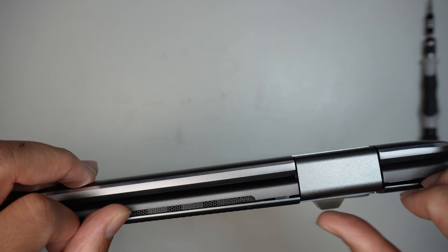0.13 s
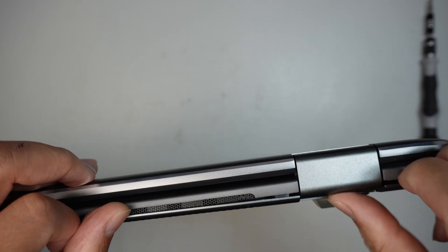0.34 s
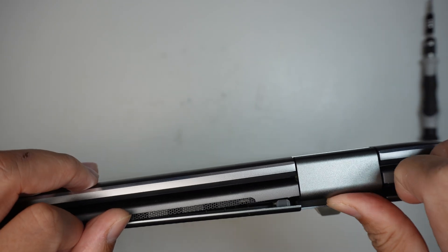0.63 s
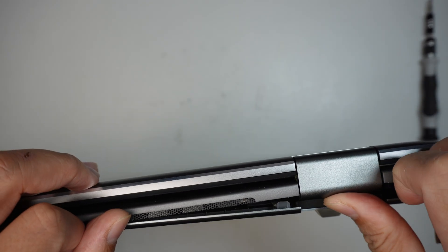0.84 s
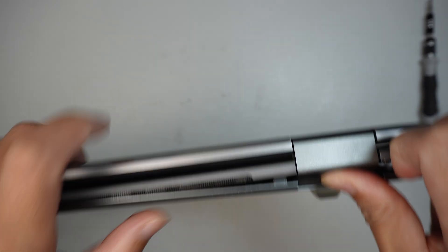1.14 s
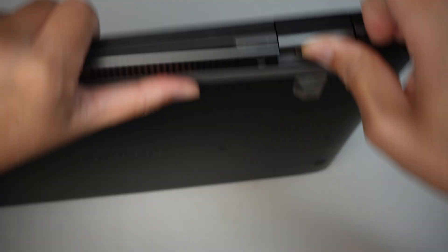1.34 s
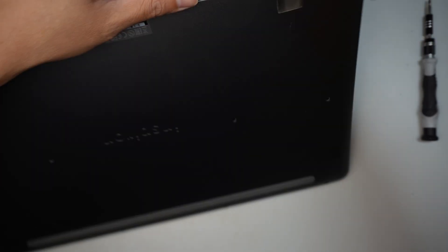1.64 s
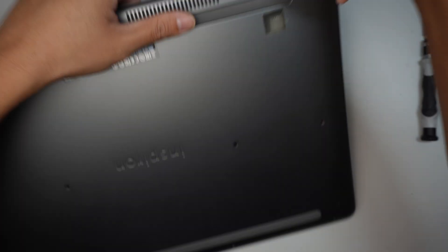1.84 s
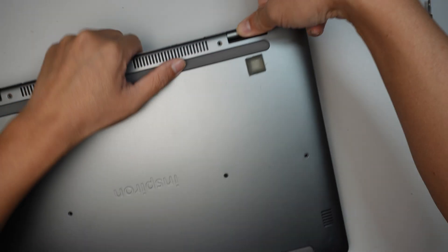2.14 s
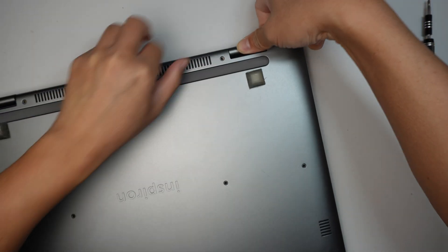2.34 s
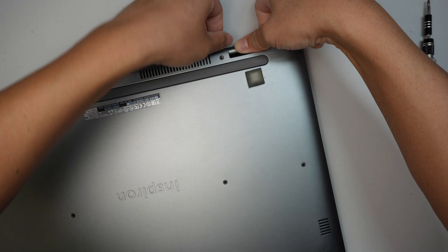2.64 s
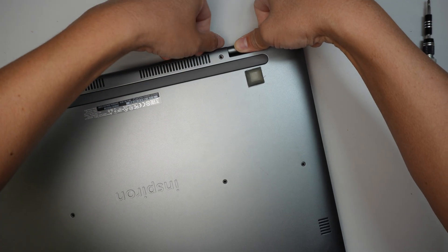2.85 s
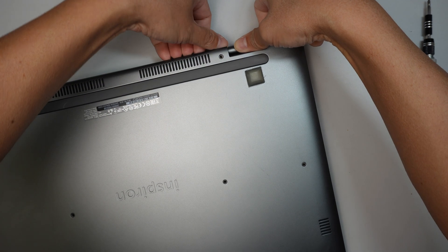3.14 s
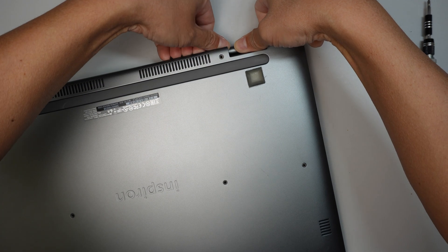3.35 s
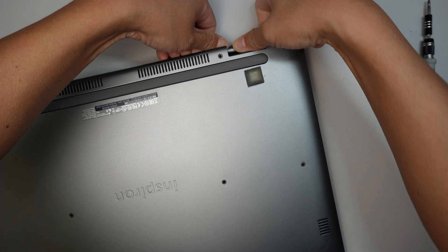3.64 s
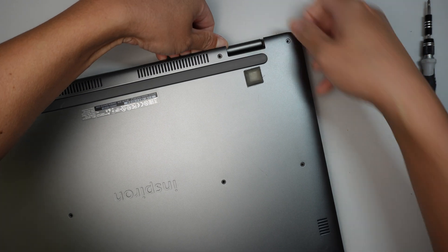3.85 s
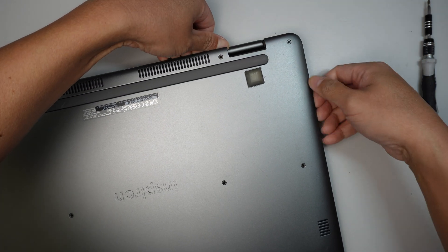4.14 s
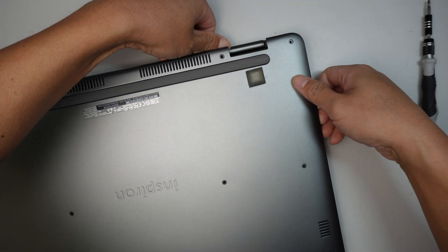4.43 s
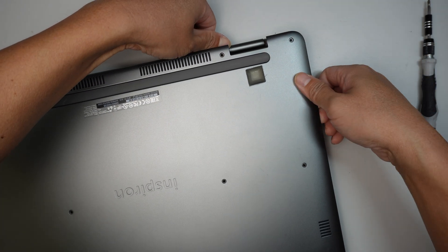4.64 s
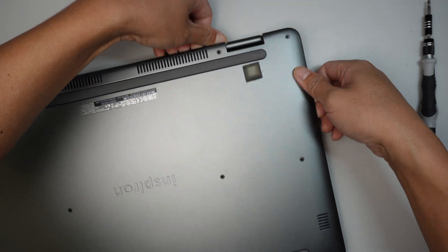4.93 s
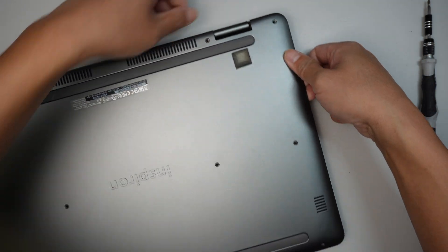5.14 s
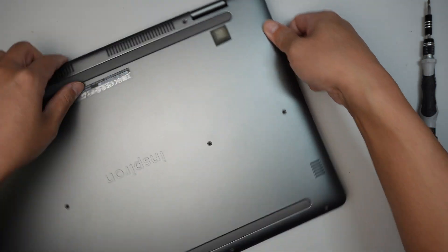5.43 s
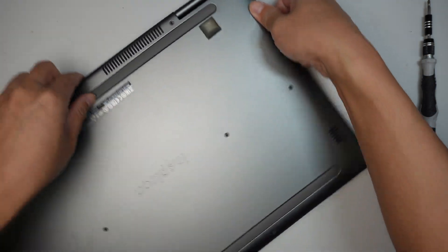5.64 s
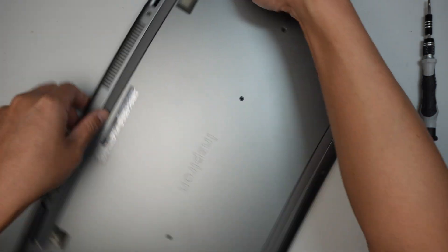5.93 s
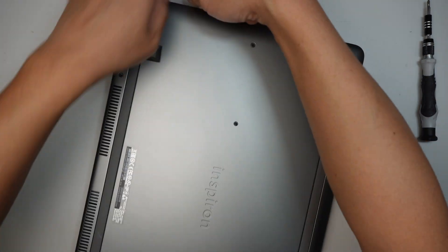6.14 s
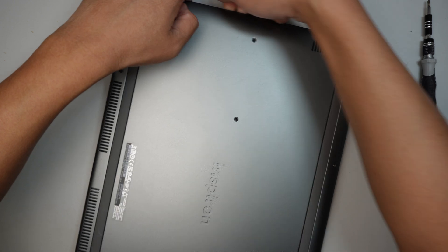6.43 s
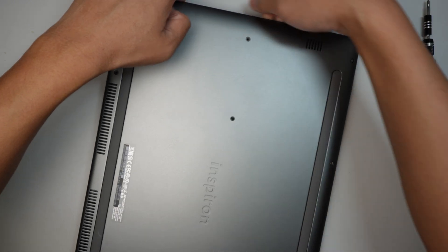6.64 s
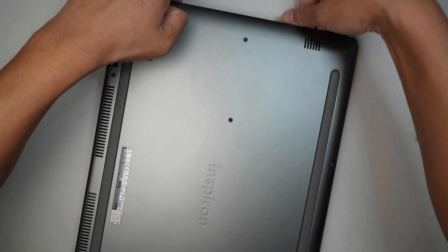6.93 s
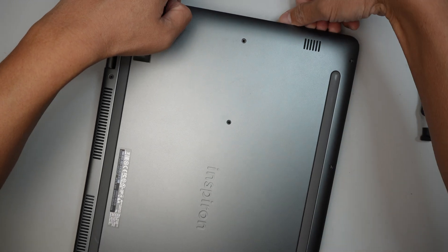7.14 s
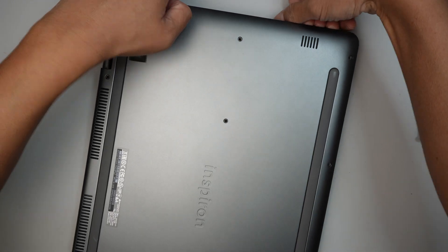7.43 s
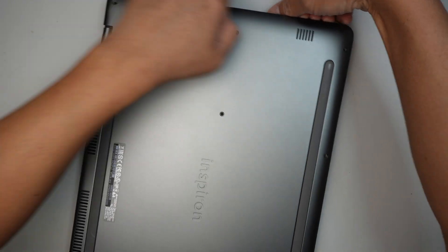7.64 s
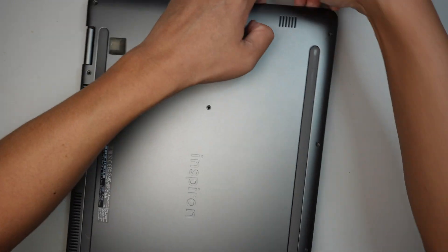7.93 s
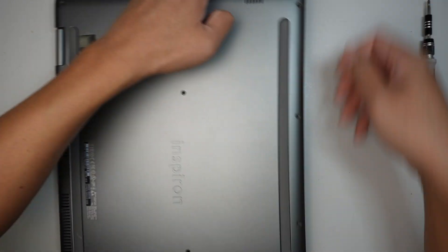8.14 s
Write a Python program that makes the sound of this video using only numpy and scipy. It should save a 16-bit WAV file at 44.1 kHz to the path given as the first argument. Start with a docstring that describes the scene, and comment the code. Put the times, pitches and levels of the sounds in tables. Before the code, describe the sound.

A small room, heard very close above a desk, with uneven low rumble and slight hiss. Faint finger ticks precede a crisp plastic snap at 0.6 s; soft rubbing follows around 1.2. A weak click at 1.4 leads into gritty dragging and a coarse, falling grind until about 2.2, when heavy snaps break in, with a dull desk bump at 2.3. Smaller clicks run to a very loud bright double crack at 2.85. From 3 to 4 it is nearly quiet, only rubs and tiny nail ticks; light clicks lead to a firm snap with a bump at 4.5. Between 5.3 and 6.2 the laptop scrapes round in bright strokes with a rising grind, then fainter shuffling. Sharp high snaps cluster at 7.1 to 7.3; deeper cracks at 7.7 to 7.8 knock the chassis and make the loose cover ring hollowly. A light, airy slide peaks near 8.15 and fades.

```python
"""A desk in a small room, two microphone ports close above it: hands pry the bottom cover off a laptop.
Plastic clips snap free as noise bursts that ring the shell; the chassis bumps the desk in decaying sines.
Fingers rub and tick along the seam, and the laptop is dragged and ground round on the desk top: the sliding
is made of trains of tiny slips, as is a faint dark noise under the handling.
Reflections, a lumpy low rumble and a faint hiss lie behind."""
import sys
import numpy as np
from scipy import signal
from scipy.fft import rfft, irfft, next_fast_len
from scipy.io import wavfile
from scipy.ndimage import uniform_filter1d, map_coordinates

SR = 44100
rng = np.random.default_rng(int(sys.argv[2]) if len(sys.argv) > 2 else 0)


def generate_wav(sig):
    """Save sig (samples, or channels by samples) to the path in sys.argv[1] as 16-bit PCM at SR."""
    pcm = np.round(np.clip(np.atleast_2d(sig).T, -1, 1) * 32767).astype(np.int16)
    wavfile.write(sys.argv[1], SR, pcm)


N = 365588

# clips snapping along the seam: t/s, level/dB, weight/dB, brightness/dB, pitch f/Hz
CLIP_SNAPS = [(0.5814, -11.5, -12, -6.5, 1910), (1.377, -34.5, -11, -7.5, 3900),
              (2.156, -15.5, -7, -15.5, 1190), (2.196, -10.5, -6.5, -11.5, 1250),
              (2.336, -17.5, -2, -17.5, 1380), (2.4102, -28, -4, -12, 3220), (2.564, -25, -6.5, -6, 4000),
              (2.613, -33, -3.5, -3, 4360), (2.734, -27, -2, -10.5, 1070), (2.78, -29.5, 2, -7, 1200),
              (2.8518, -10, -6.5, -4, 3070), (2.8649, -12, -5.5, -18, 2206), (4.053, -30, -3.5, -4, 2130),
              (4.265, -29.5, -4.5, -1.5, 2320), (4.4935, -16.5, -8, -0.5, 3900),
              (4.4991, -17.5, -1, -7.5, 910), (4.5785, -29, -2.5, -8, 3520),
              (7.0585, -28, -8.5, -6.5, 3100), (7.0797, -25.5, -13, 0, 4430), (7.087, -19, -5, 1, 5400),
              (7.102, -18, -2.5, -3, 4400), (7.2445, -30, -14, -14, 3470), (7.275, -13, -5, -3.5, 5460),
              (7.348, -27, -8, -7.5, 2540), (7.7143, -16.5, -16, -27, 3380), (7.7199, -11, -4.5, -6.5, 830),
              (7.7447, -18.5, -3, -13, 2030), (7.791, -13, -5, -11, 1580), (7.8145, -31.5, -14, -3, 1620)]
# colour of a sudden blow on the plastic: f/Hz, level/dB
BLOW_COLOUR = [(110, -15.5), (290, -11.5), (550, 2.5), (3800, 3), (9000, -6.5), (15500, -16.5)]


def amp(db):
    """Decibels to gain."""
    return 10 ** (np.asarray(db) / 20)


def evened(x):
    """Scales to rms 1."""
    return x / np.sqrt(np.mean(x ** 2) + 1e-20)


def read(points, hz):
    """Reads a table on a log-frequency axis."""
    f, value = np.transpose(points)
    return np.interp(np.log(hz + 1), np.log(f + 1), value)


def add(mix, s, sound):
    """Mixes a sound in at a time in seconds."""
    part = mix[..., max(round(s * SR), 0):][..., :sound.shape[-1]]
    part += sound[..., :part.shape[-1]]


def shaped(x, gain):
    """Filters by a gain that is a function of frequency."""
    size = next_fast_len(x.shape[-1] + 512)
    spectrum = rfft(x, size) * gain(np.fft.rfftfreq(size, 1 / SR))
    return irfft(spectrum, size)[..., :x.shape[-1]]


def coloured(x, colour, size=1024):
    """Causal minimum-phase filter with a given spectrum, so that attacks stay sharp."""
    log_gain = np.log(amp(read(colour, abs(np.fft.fftfreq(size, 1 / SR)))))
    taps = np.fft.ifft(np.exp(np.conj(signal.hilbert(log_gain)))).real
    taps = taps.reshape((1,) * (x.ndim - 1) + (-1,))
    return signal.fftconvolve(x, taps, axes=-1)[..., :x.shape[-1]]


def resonate(x, hz, width):
    """A resonance of gain 1 at its peak, width in Hz."""
    return signal.lfilter(*signal.iirpeak(hz, hz / width, fs=SR), x)


def glide(x, hz, width):
    """A resonance of gain 1 that follows a pitch curve: shift to zero, smooth, shift back."""
    turn = np.exp(2j * np.pi * np.cumsum(hz) / SR)
    r = np.exp(-np.pi * width / SR)
    return 2 * (turn * signal.lfilter([1 - r], [1, -r], x / turn)).real


def spread(pair):
    """Two unrelated signals become what two close microphone ports hear of a wide source."""
    # left-right likeness of spread-out sound: f/Hz, likeness (0 to 1)
    likeness = [(1500, 0.96), (5000, 0.79), (15000, 0.25)]
    alike = lambda hz: np.clip(read(likeness, hz), -1, 1)
    unlike = lambda hz: np.sqrt(1 - alike(hz) ** 2)
    return np.array([pair[0], shaped(pair[0], alike) + shaped(pair[1], unlike)])


def registers(x, low_hz=1000, high_hz=4500):
    """Splits a sound into middle, weight and brightness."""
    cuts = [([low_hz, high_hz], "bandpass"), (low_hz, "lowpass"), (high_hz, "highpass")]
    return [signal.sosfilt(signal.butter(3, hz, kind, fs=SR, output="sos"), x) for hz, kind in cuts]


def voiced(x, db, weight_db, bright_db, over=slice(None), lean=0.33, usual_db=-6):
    """Sets level, weight and brightness: a firm broad contact is heavy, a light sharp one bright."""
    middle, low, high = (band / np.sqrt(np.mean(band[..., over] ** 2)) for band in registers(x))
    upper_middle = shaped(middle, lambda hz: hz ** 4 / (hz ** 4 + 2500 ** 4))
    tilt = amp(lean * (bright_db - usual_db))  # brightness also tilts the middle register
    middle = (middle + (tilt - 1) * upper_middle) / np.sqrt(tilt)
    return amp(db) * (middle + amp(weight_db) * low + amp(bright_db) * high)


def shell(x, direct, sharpness=18):
    """Part of a force radiates at once; the rest rings the resonances of the shell."""
    # resonances of the shell: f/Hz, level/dB
    modes = [(500, -9.5), (880, -6.5), (1150, -1.5), (1540, -2.5), (1890, -8), (2160, -4.5), (2490, -7.5),
             (3130, -4), (4380, -9.5), (5520, -8.5), (6450, -4), (8350, -11.5)]
    return direct * x + sum(amp(db) * resonate(x, hz, hz / sharpness) for hz, db in modes)


def wandering(x, depth_db, patch_hz, drift_s, size=512):
    """The colour drifts: resonances about patch_hz wide swell and fade over about drift_s."""
    hz, t, z = signal.stft(np.c_[x, np.zeros((2, size))], SR, nperseg=size)
    where = np.meshgrid(hz / patch_hz, t / drift_s, indexing="ij")
    patches = map_coordinates(rng.standard_normal((size, size // 10)), where, order=1, mode="wrap")
    return signal.istft(z * amp(depth_db * patches), SR, nperseg=size)[1][:, :x.shape[-1]]


def broadly_wandering(x):
    """Broad, quick drift in the colour of a moving contact."""
    return wandering(x, depth_db=2.2, patch_hz=600, drift_s=.05)


def friction(length, slips_per_s, uneven_db, wash, judder_db, judder_s, direct=1.3):
    """Tiny slips of uneven size, bunched by a juddering grip, excite the shell; the colour drifts."""
    # colour of sliding contact: f/Hz, level/dB
    slide_colour = [(280, -18.5), (500, -5.5), (750, -5), (1300, 1.5), (6500, 4.5), (8500, 2), (15500, -9)]
    slip_size = amp(uneven_db * np.minimum(rng.exponential(1, length), 4))
    slips = evened(slip_size * (rng.random(length) < slips_per_s / SR))
    judder_length = max(int(judder_s * SR), 1)
    grip = evened(uniform_filter1d(rng.standard_normal(length), judder_length))
    force = (slips + wash) * amp(judder_db * grip) * rng.standard_normal((2, length))
    x = shell(coloured(spread(force), slide_colour), direct)
    return wandering(x, depth_db=3.8, patch_hz=130, drift_s=.15)


def snaps(crack_s=0.0021, rise_s=0.0012, tick_s=0.00032, tick_db=3,
          rattle_db=-14, rattle_t60=0.073, rattle_top_hz=6000, direct=7):
    """A clip lets go with a tick and a crack, strikes its seat again, rings and sets the case rattling."""
    rebound_min_s, rebound_max_s, rebound_db = 0.0034, 0.0076, -12.5
    clip_ring, clip_width_hz = 1.9, 400
    out, t = np.zeros(N), np.arange(SR // 6) / SR
    attack = 1 - np.exp(-t / rise_s)
    blow = attack * (np.exp(-t / crack_s) + amp(tick_db) * np.exp(-t / tick_s))
    dying = attack * amp(rattle_db - 60 * t / rattle_t60)
    for s, db, weight_db, bright_db, hz in CLIP_SNAPS:
        crack, rattle = rng.standard_normal((2, len(t)))
        rebound_s = rng.uniform(rebound_min_s, rebound_max_s)
        crack = crack * (blow + amp(rebound_db) * np.interp(t - rebound_s, t, blow))
        clip = clip_ring * resonate(crack, hz, clip_width_hz)
        rattle = dying * shaped(rattle, lambda f: 1 / np.hypot(1, f / rattle_top_hz))
        x = shell(coloured(crack + clip + rattle, BLOW_COLOUR), direct)
        # the level is set over the first hundredth of a second
        add(out, s, voiced(x, db, weight_db, bright_db, slice(SR // 100)))
    return out


def body_rings(rise_s=0.00088, bump_t60=0.085, cover_hz=620):
    """Decaying sines: chassis bumps on the desk, each with a hollow knock, and the loose cover's note."""
    # the chassis bumps the desk: t/s, level/dB, f/Hz
    bump_list = [(2.335, -19.5, 113), (2.885, -26, 80), (4.503, -28, 120), (7.285, -27.5, 90),
                 (7.75, -19.5, 115), (7.804, -26, 97)]
    # hollow modes of the chassis in each bump: f/Hz, level re bump/dB
    knock_modes = [(205, -7), (375, -11)]
    # the loosened cover swings: t/s, level/dB, t60/s
    swing_list = [(7.7202, -19, 0.11), (7.79, -10, 0.17)]
    out, t = np.zeros(N), np.arange(SR // 2) / SR

    def ring(hz, db, t60):
        """One mode, struck softly and dying away."""
        return amp(db - 60 * t / t60) * np.sin(2 * np.pi * hz * t) * (1 - np.exp(-t / rise_s))

    for s, db, hz in bump_list:
        knock = sum(ring(mode_hz, db + mode_db, bump_t60) for mode_hz, mode_db in knock_modes)
        add(out, s, ring(hz, db, bump_t60) + knock)
    for s, db, t60 in swing_list:
        add(out, s, ring(cover_hz, db, t60))
    return out


def drags():
    """Each shove over the desk speeds up and slows; faster sliding is louder, brighter and less weighty."""
    # shoves: start t/s, fastest t/s, end t/s, then at the fastest: level/dB, weight/dB, brightness/dB
    shove_list = [(1.386, 1.65, 1.95, -23, -14, -7.5), (1.727, 1.83, 1.96, -23.5, -15.5, -6.5),
                  (1.875, 2.08, 2.24, -26.5, -11.5, -12), (4.851, 4.95, 5.08, -39, -3, -6.5),
                  (4.758, 5.424, 5.55, -41, -1, -3), (5.26, 5.598, 5.72, -28.5, -11, 2.5),
                  (5.638, 5.874, 6.08, -28, -4, 0.5), (5.848, 6.032, 6.15, -29.5, -10.5, 1.5),
                  (6.149, 6.204, 6.3, -39, -3.5, -9.5), (6.27, 6.44, 6.88, -36.5, -3, -5.5),
                  (6.604, 6.76, 6.85, -39, -13, -6), (7.411, 7.706, 7.8, -35, -2.5, -6.5),
                  (7.839, 8.145, 8.6, -31, -8.5, 1.5)]
    # dB gained for each dB of sliding speed
    level_per_speed, weight_per_speed, bright_per_speed = 0.94, -0.34, 0.59
    out = np.zeros((2, N))
    for start, fastest, end, db, weight_db, bright_db in shove_list:
        t = np.arange(start, end, 1 / SR)
        x = friction(len(t), slips_per_s=4000, uneven_db=2.0, wash=0.8,
                     judder_db=1.47, judder_s=0.03, direct=.8)
        x = broadly_wandering(x)
        speed = np.sin(np.pi / 2 * np.interp(t, [start, fastest, end], [0, 1, 0]))
        speed_db = 20 * np.log10(speed + 1e-3)
        add(out, start, voiced(x, db + level_per_speed * speed_db,
                               weight_db + weight_per_speed * speed_db,
                               bright_db + bright_per_speed * speed_db))
    return out


def grinds(peak_width_hz=750, desk_hz=480, desk_width_hz=170, desk_db=4):
    """A hard-pressed edge slips coarsely: a resonance glides as the laptop turns; the desk top drones."""
    # grinds: start t/s, hardest t/s, end t/s, level/dB, resonance from f/Hz, to f/Hz
    grind_list = [(1.555, 1.571, 1.63, -21, 1760, 2000), (1.603, 1.7, 1.88, -21, 2110, 1120),
                  (5.721, 5.85, 6.08, -27, 1720, 2690)]
    out = np.zeros((2, N))
    for start, hardest, end, db, from_hz, to_hz in grind_list:
        t = np.arange(start, end, 1 / SR)
        x = friction(len(t), slips_per_s=900, uneven_db=0.0, wash=0.59, judder_db=1.5, judder_s=0.022)
        edge = glide(x, np.geomspace(from_hz, to_hz, len(t)), peak_width_hz)
        desk = amp(desk_db) * resonate(x, desk_hz, desk_width_hz)
        pressure = np.sin(np.pi / 2 * np.interp(t, [start, hardest, end], [0, 1, 0]))
        add(out, start, amp(db) * evened(edge + desk) * pressure)
    return out


def rubs(overrun_s=0.0042, weight_db=-8, level_db=2):
    """Short grainy strokes of skin and nail along the seam, and a very short faint noise into each snap."""
    # strokes: start t/s, end t/s, level before the common level_db/dB, brightness/dB
    stroke_list = [(0.364, 0.426, -41.5, -4), (0.935, 0.969, -45.5, -13), (1.003, 1.183, -52, 5.5),
                   (1.166, 1.315, -34, -18.5), (2.405, 2.46, -39.5, -5), (2.542, 2.61, -35, -31),
                   (2.633, 2.671, -43, -11), (3.059, 3.145, -49.5, -21.5), (3.163, 3.237, -51, -46),
                   (3.597, 3.645, -45.5, -29.5), (3.895, 3.951, -46, 3.5), (3.937, 4.073, -45, -7.5),
                   (4.231, 4.275, -43, -18), (6.857, 7.004, -49, -13.5), (7.005, 7.069, -46, -1.5)]
    # a very short faint noise leads into each snap
    lead_s, lead_top_db = 0.01, -52
    lead_ins = [(s - lead_s, s, min(lead_top_db, db - 24.5), bright_db)
                for s, db, _, bright_db, _ in CLIP_SNAPS]
    out = np.zeros((2, N))
    for start, end, db, bright_db in stroke_list + lead_ins:
        length = int((max(end - start, 0) + 2 * overrun_s) * SR)
        x = friction(length, slips_per_s=1200, uneven_db=2.5, wash=0.85, judder_db=-1.0, judder_s=0.0094)
        x = voiced(broadly_wandering(x), db + level_db, weight_db, bright_db)
        add(out, start - overrun_s, x * np.hanning(length))
    return out


def ticks(tick_s=0.0029, ring=5.9, width_hz=700, top_hz=6500, direct=2.5):
    """A fingernail catches the edge and slips off: a light tick with one short resonance."""
    # nail ticks on the edge of the cover: t/s, level/dB, resonance f/Hz
    tick_list = [(0.309, -58, 3500), (0.365, -53, 3040), (0.536, -53.5, 1400), (0.935, -55.5, 3280),
                 (3.433, -62.5, 6000), (3.62, -59, 2500), (4.007, -45.5, 4350), (4.072, -45.5, 6200),
                 (4.168, -44, 880), (4.192, -53, 2490), (4.277, -43.5, 2200), (4.369, -43, 2230),
                 (4.535, -43.5, 5700), (7.184, -48.5, 620)]
    out, t = np.zeros(N), np.arange(SR // 20) / SR
    for s, db, hz in tick_list:
        force = rng.standard_normal(len(t)) * np.sqrt(t) * np.exp(-t / tick_s)
        force = force + ring * resonate(force, hz, width_hz)
        force = shaped(force, lambda f: 1 / np.hypot(1, f / top_hz))
        add(out, s, amp(db) * evened(shell(coloured(force, BLOW_COLOUR), direct)))
    return out


def dark_noise(weight_db=-3, bright_db=-27):
    """Faint dark noise of shifting colour under the handling, made of dense tiny slips."""
    # stretches of dark noise: start t/s, end t/s, level/dB
    stretches = [(0, 0.6, -60.5), (2.497, 2.857, -46), (2.8, 3.698, -64.5), (3.947, 4.743, -55)]
    out = np.zeros((2, N))
    for start, end, db in stretches:
        length = int((end - start) * SR)
        x = friction(length, slips_per_s=2500, uneven_db=2, wash=.7, judder_db=2, judder_s=.02)
        x = wandering(x, depth_db=4.5, patch_hz=260, drift_s=.025)
        fade = np.sqrt(signal.windows.tukey(length))
        add(out, start, voiced(x, db, weight_db, bright_db) * fade)
    return out


def room(x, early_db=-11.0, early_t60=0.13, late_db=-19, gap_s=.003):
    """Quick reflections from the desk and nearby things, then the tail of the room, as decaying noise."""
    # decay of the tail: f/Hz, t60/s
    decay = [(150, 0.59), (2500, 0.35), (6000, 0.3)]
    noise = spread(rng.standard_normal((2, SR // 2)))
    hz, t, z = signal.stft(noise, SR, nperseg=256)
    z = z * amp(-60 * t / read(decay, hz)[:, None])
    late = signal.istft(z, SR, nperseg=256)[1][:, :SR // 2]
    t = np.arange(SR // 2) / SR
    early = spread(rng.standard_normal(noise.shape)) * amp(-60 * t / early_t60)
    parts = [(early_db, early), (late_db, late)]
    tail = sum(amp(db) * part / np.linalg.norm(part[0]) for db, part in parts)
    out = np.zeros((2, N))
    add(out, gap_s, signal.fftconvolve(x, tail, axes=1))
    return out


def background(lump_s=0.045, lump_db=8.5, hiss_db=-71.5):
    """Low noise of lumpy, slowly changing level, alike in both ports, and a faint wide hiss."""
    # colour of the rumble: f/Hz, level/dB
    rumble_colour = [(20, -21), (55, 4.5), (120, 2.5), (165, -9.5), (650, -60.5)]
    # course of the rumble: t/s, level/dB
    rumble_level = [(0, -51), (0.501, -44), (1.1, -55.5), (2.299, -41.5), (4, -54.5), (5.499, -46),
                    (6.7, -61.5)]
    # colour of the hiss: f/Hz, level/dB
    hiss_colour = [(2500, 4.5), (8000, -12.5), (15000, -43.5)]
    lumps = evened(uniform_filter1d(rng.standard_normal(N), int(lump_s * SR)))
    lumpy = rng.standard_normal(N) * amp(lump_db * np.tanh(lumps))
    rumble = evened(shaped(lumpy, lambda hz: amp(read(rumble_colour, hz))))
    level = amp(np.interp(np.arange(N) / SR, *np.transpose(rumble_level)))
    hiss = evened(coloured(spread(rng.standard_normal((2, N))), hiss_colour))
    return rumble * level + amp(hiss_db) * hiss


def scene(lag_hz=4200, right_db=1, count=3):
    """The work lies a little to one side: direct treble reaches the right port later and stronger."""
    handling = body_rings() + drags() + grinds() + rubs() + ticks() + dark_noise()
    near = snaps() + handling

    def port(hz):
        """Lag and gain of the right port."""
        return np.exp(-.4j * (hz / lag_hz) ** 1.33) * amp(right_db * np.minimum(hz / lag_hz, 2))

    # a snap radiates differently in each direction; the walls return a blend of several
    snap_tails = sum(room(snaps()[None]) for _ in range(count)) / np.sqrt(count)
    direct = np.array([near[0], shaped(near[1], port)])
    return direct + room(handling) + snap_tails + background()


def record(dry, low_cut_hz=42, edge_hz=15700):
    """The microphone sheds deep bass; peaks beyond full scale clip; then the band limit."""
    thinned = signal.sosfilt(signal.butter(2, low_cut_hz, "highpass", fs=SR, output="sos"), dry)
    lowpass = signal.firwin(511, edge_hz, window=("kaiser", 9), fs=SR)
    return signal.oaconvolve(np.clip(thinned, -1.0, 1.0), lowpass[None], "same", axes=1)


dry = scene()
out = record(dry)
generate_wav(out)
```